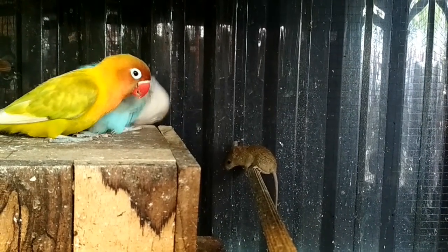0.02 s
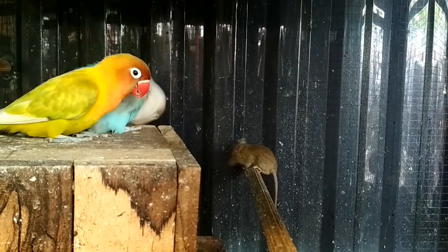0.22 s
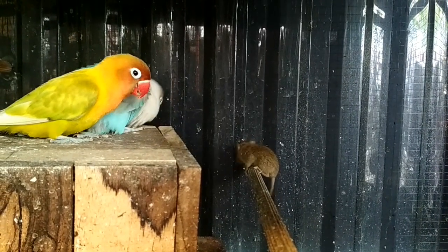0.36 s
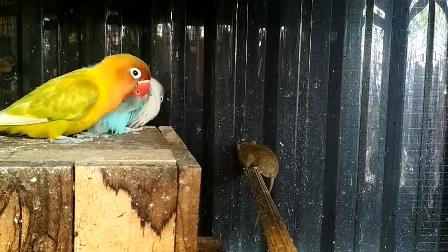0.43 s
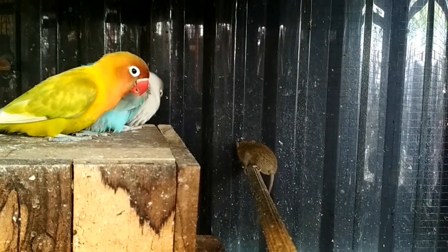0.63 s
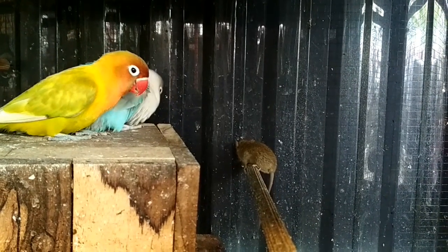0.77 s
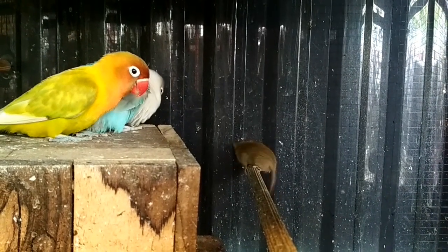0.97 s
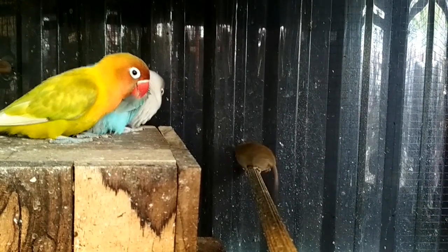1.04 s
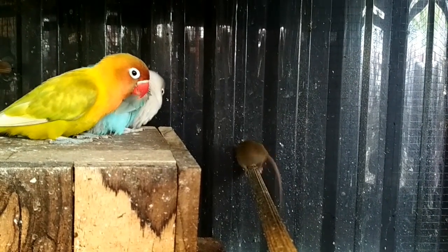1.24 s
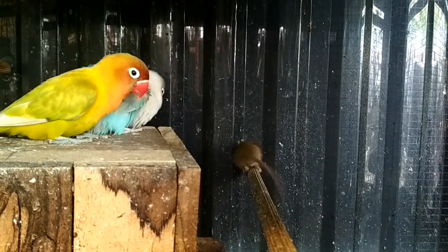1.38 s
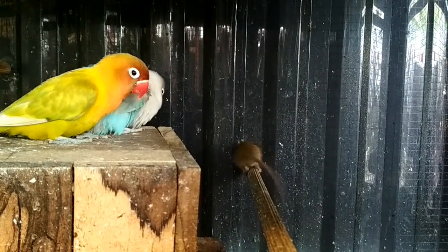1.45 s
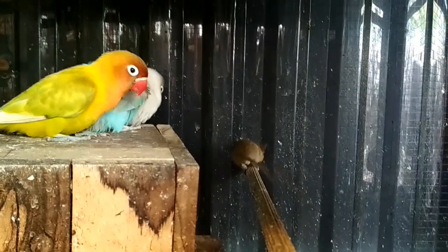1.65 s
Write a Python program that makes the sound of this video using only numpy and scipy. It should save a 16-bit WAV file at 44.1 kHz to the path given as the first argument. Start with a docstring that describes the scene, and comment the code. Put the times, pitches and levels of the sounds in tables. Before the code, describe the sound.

Two piercing mouse squeaks, loud then weak, with tiny claw ticks over faint air and low hum

```python
"""Mouse squeaks in an aviary.

A mouse on a perch in a sheet-metal aviary squeaks twice, loudly then softly; a faint chirp comes later.
Squeaks are wavering partials plus throat-coloured noise: low start, rasp, jump to a high whistle.
Claw ticks, a scuff and shuffles are noise bursts; decaying noise echoes give the walls' brief ring.
Air and a thin hiss are stereo noise, the drone narrow noise, the hums wavering sines."""
import sys
import numpy as np
from scipy import signal
from scipy.fft import rfft, irfft, next_fast_len
from scipy.io import wavfile
from scipy.ndimage import uniform_filter1d, minimum_filter1d, map_coordinates

SR = 44100
rng = np.random.default_rng(int(sys.argv[2]) if len(sys.argv) > 2 else 0)


def wav_out(sig):
    """Save sig, one row per channel (or a flat mono array), as 16-bit PCM at SR to the path in sys.argv[1]."""
    wavfile.write(sys.argv[1], SR, np.round(np.clip(np.atleast_2d(sig).T, -1, 1) * 32767).astype(np.int16))


N = 74970
T = np.arange(N) / SR


def amp(db):
    """Decibels to gain."""
    return 10 ** (np.asarray(db) / 20)


def unit(x):
    """Scale to rms 1."""
    return x / np.sqrt(np.mean(x ** 2) + 1e-20)


def along(points, hz):
    """Read (Hz, value) points on a log frequency axis."""
    f, v = np.transpose(points)
    return np.interp(np.log(hz + 1), np.log(f + 1), v)


def curves(rows):
    """One value per sample for each column after the time."""
    s, *cols = np.transpose(rows)
    return [np.interp(T, s, c) for c in cols]


def swells(rows):
    """Smooth rises and falls from (s, half length s, level dB) rows."""
    return sum(amp(db) * np.exp(-((T - s) / half) ** 2) for s, half, db in rows)


def wobble(knots_per_s):
    """A smooth random curve through normally distributed knots."""
    knots = rng.standard_normal(size=8192)
    return map_coordinates(knots, [T * knots_per_s], mode="wrap")


def filtered(x, response):
    """Apply a frequency response."""
    m = next_fast_len(N + SR // 2)
    return irfft(rfft(x, m) * response(np.fft.rfftfreq(m, 1 / SR)), m)[..., :N]


def noise(colour):
    """Coloured noise of rms 1."""
    return unit(filtered(rng.standard_normal(N), lambda hz: amp(along(colour, hz))))


def lean(tilt, hz):
    """Left and right gains for a level difference, at constant mean power."""
    g = amp(np.outer([.5, -.5], along(tilt, hz)))
    return g / np.sqrt(np.mean(g ** 2, axis=0))


# Stereo likeness. Each row: frequency in Hz, left-right correlation from 0 to 1.
LIKENESS = [(60, 0.99), (150, 0.92), (300, 0.81), (700, 0.64), (1300, 0), (4000, 0.026), (12000, 0)]
# Stereo balance. Each row: frequency in Hz, left minus right in dB.
AIR_BALANCE = [(100, -0.5), (1200, 3.5), (4000, 1.5), (10000, -6.5), (15000, -1.5)]


def diffuse(colour):
    """Stereo noise of rms 1, alike in the bass and unrelated in the treble."""
    def mid_side_gains(hz):
        turn = np.arccos(np.clip(along(LIKENESS, hz), -1, 1)) / 2
        return amp(along(colour, hz)) * [np.cos(turn), np.sin(turn)]

    mid, side = filtered(rng.standard_normal((2, N)), mid_side_gains)
    stereo = np.array([mid + side, mid - side])
    return unit(filtered(stereo, lambda hz: lean(AIR_BALANCE, hz)))


AIR_DB = -47.5
# Air spectrum. Each row: frequency in Hz, relative level in dB.
AIR_COLOUR = [(15, -22), (25, -7.5), (46, -2), (70, -16), (120, -0.5), (184, -5), (235, -8.5), (437, -9.5),
              (542, -14), (1590, -15.5), (4450, -22), (8050, -21.5), (11700, -14), (15800, -20)]


def air():
    """Steady outdoor air as diffuse coloured noise."""
    return amp(AIR_DB) * diffuse(AIR_COLOUR)


HISS_OFFSET_DB, HISS_WOBBLE_DB = 4, 0.3
# Treble level. Each row: time in seconds, level in dB before HISS_OFFSET_DB.
HISS_LEVEL = [(0, -47), (.45, -53.5), (.75, -58.5), (.9, -56), (1.0, -49), (1.12, -48.5), (1.2, -63),
              (1.42, -51), (1.7, -54.5)]
# Hiss spectrum. Each row: frequency in Hz, relative level in dB.
HISS_SPECTRUM = [(4000, -13), (8500, -14.5), (11500, 2.5), (13500, -3), (15800, -1)]


def hiss():
    """Thin treble noise whose level rises and falls."""
    level_db = curves(HISS_LEVEL)[0] + HISS_OFFSET_DB + HISS_WOBBLE_DB * wobble(56.3)
    return amp(level_db) * diffuse(HISS_SPECTRUM)


DRONE_HZ, DRONE_SIGMA_HZ, DRONE_DB = 171.7, 11.6, -61.5


def drone():
    """Noise narrowed by a Gaussian band until it has a pitch."""
    band = lambda hz: np.exp(-((hz - DRONE_HZ) / DRONE_SIGMA_HZ) ** 2 / 2)
    return amp(DRONE_DB) * unit(filtered(rng.standard_normal(N), band))


HUM_WANDER_SHARE = 0.03


def wavering_tone(hz):
    """A distant sine of rms 1 whose frequency wanders."""
    wandering_hz = hz * (1 + HUM_WANDER_SHARE * wobble(24.02))
    return unit(np.sin(2 * np.pi * np.cumsum(wandering_hz) / SR))


HUM_HZ = 112
# Hum level. Each row: time in seconds, level in dB.
HUM_LEVEL = [(.12, -76), (.18, -54), (.9, -57), (1.05, -76), (1.38, -62), (1.46, -46.5), (1.55, -54.5),
             (1.7, -62)]


def low_hum():
    """A wavering low tone that comes and goes."""
    return amp(curves(HUM_LEVEL)[0]) * wavering_tone(HUM_HZ)


TICK_T60_S = 0.02
# Claw ticks. Each row: start in seconds, level in dB.
CLAW_TICKS = [(.004, -30.5), (0.202, -21.5), (0.953, -38), (0.982, -34.5), (1.086, -31.5), (1.093, -38),
              (1.135, -35.5), (1.246, -34), (1.301, -36.5)]
# Tick spectrum. Each row: frequency in Hz, relative level in dB.
TICK_SPECTRUM = [(300, -15), (2000, -12), (3500, -8.5), (7000, -17.5), (11000, 5), (14000, 1.5),
                 (16000, -7)]


def claw_ticks():
    """Sharp, bright noise bursts that decay exponentially."""
    envelope = sum((T >= s) * amp(db - 60 * np.abs(T - s) / TICK_T60_S) for s, db in CLAW_TICKS)
    return noise(TICK_SPECTRUM) * envelope


SCUFF_S, SCUFF_HALF_S, SCUFF_DB = 0.08, 0.0092, -43
# Scuff spectrum. Each row: frequency in Hz, relative level in dB.
SCUFF_SPECTRUM = [(1000, -14), (2400, -13), (3200, -1), (6500, -7), (9000, -8), (15000, -19.5)]


def scuff():
    """A foot slips on the perch: a noise swell duller than the ticks."""
    return noise(SCUFF_SPECTRUM) * swells([(SCUFF_S, SCUFF_HALF_S, SCUFF_DB)])


EARLY_DB, EARLY_T60_S, TAIL_DB, WALL_DELAY_S = 4.5, 0.099, -6.5, .0022
EVEN_HZ = 240  # smoothing width for evening out the colour
# Wall decay. Each row: frequency in Hz, T60 in seconds.
WALL_DECAY = [(300, 0.52), (4500, 0.23), (9000, 0.23), (15000, 0.2)]
# Mouse stereo balance. Each row: frequency in Hz, left minus right in dB.
MOUSE_BALANCE = [(2500, 1.5), (4400, -2.5), (8500, -3.5), (11000, -13), (14000, 2)]


def aviary(x):
    """Direct sound plus dense near-wall echoes and a short tail, even in broad colour, mostly right."""
    hz, t, z = signal.stft(rng.standard_normal((2, SR // 2)), SR, nperseg=256)
    decay = amp(-60 * t / along(WALL_DECAY, hz)[:, None])
    tail = signal.istft(z * decay, SR, nperseg=256)[1]
    early = rng.standard_normal(tail.shape) * amp(-60 * T[:tail.shape[1]] / EARLY_T60_S)
    echo = amp(TAIL_DB) * tail / np.linalg.norm(tail[0])
    echo += amp(EARLY_DB) * early / np.linalg.norm(early[0])
    m = 2 * N
    f = np.fft.rfftfreq(m, 1 / SR)
    paths = 1 + rfft(echo, m) * np.exp(-2j * np.pi * f * WALL_DELAY_S)
    paths /= np.sqrt(uniform_filter1d(np.abs(paths) ** 2, int(EVEN_HZ / f[1]), axis=1))
    return irfft(rfft(x, m) * paths * lean(MOUSE_BALANCE, f), m)[:, :N]


# Shuffles. Each row: centre in seconds, half length in seconds, level in dB.
SHUFFLE_SWELLS = [(0.094, 0.016, -49.5), (0.205, 0.07, -53.5), (0.308, 0.033, -50), (0.48, 0.018, -51.5),
                  (1.367, 0.044, -52)]
# Shuffle spectrum. Each row: frequency in Hz, relative level in dB.
SHUFFLE_SPECTRUM = [(100, -26), (320, -1), (800, -1.5), (2000, -3.5), (5000, -33), (15000, -34)]


def shuffles():
    """Dull, brief rubbing on wood as swells of diffuse noise."""
    return diffuse(SHUFFLE_SPECTRUM) * swells(SHUFFLE_SWELLS)


WAVER_KNOTS_PER_S = 521.6
JITTER_SHARE, JITTER_KNOTS_PER_S = 0.102, 1800  # pitch scatter at roughness 1
SMEAR_RADIANS, SMEAR_KNOTS_PER_S = 0.94, 418.8  # first partial at roughness 1
FLUTTER_DB, FLUTTER_KNOTS_PER_S = 4, 258.5
WHISTLE_HZ = 3960  # pitch where the voice flips into its whistle
RASP_DB, EDGE_S = -1, 0.0024


def squeak(rows, throat, waver_share, low_rasp_db):
    """A wavering tone made breathy by phase drift; roughness trades it for rasp, less low in the whistle."""
    pitch_hz, level_db, rough = curves(rows)
    rough = np.clip(rough, 0, 1)

    waver = waver_share * wobble(WAVER_KNOTS_PER_S)
    jitter = JITTER_SHARE * rough ** 2 * wobble(JITTER_KNOTS_PER_S)
    phase = 2 * np.pi * np.cumsum(pitch_hz * (1 + waver + jitter)) / SR

    orders = np.arange(1, 7)[:, None]
    drift = np.array([wobble(SMEAR_KNOTS_PER_S) for _ in orders])
    smear = SMEAR_RADIANS * np.sqrt(orders * rough) * drift
    # Partials fade out below the Nyquist frequency.
    audible = np.clip((SR / 2 - orders * pitch_hz) / pitch_hz - .5, 0, 1)
    partials = (audible * np.sin(orders * phase + smear)).sum(0)
    tone = filtered(partials, lambda hz: amp(along(throat, hz)))
    # Divide by the expected rms so that the throat leaves the level alone.
    tone /= np.sqrt(((audible * amp(along(throat, orders * pitch_hz))) ** 2).sum(0) / 2)

    rush = noise(throat)
    high = filtered(rush, lambda hz: hz > WHISTLE_HZ)
    low = filtered(rush, lambda hz: (hz > throat[0][0]) & (hz <= WHISTLE_HZ))
    rasp = amp(RASP_DB) * rough * (high + low * amp(low_rasp_db * (pitch_hz > WHISTLE_HZ)))

    gate = np.clip(np.minimum(T - rows[0][0], rows[-1][0] - T) / EDGE_S + .5, 0, 1)
    flutter_db = FLUTTER_DB * np.tanh(wobble(FLUTTER_KNOTS_PER_S))
    return gate * amp(level_db + flutter_db) * (np.sqrt(1 - rough ** 2) * tone + rasp)


# Loud squeak. Each row: time in seconds, pitch in Hz, level in dB, roughness from 0 to 1.
LOUD_PATH = [(.205, 2560, -36, 0.2), (.213, 2653, -25.5, 0.27), (.223, 2698, -17.5, .3),
             (.232, 2699, -16, 0.54), (.241, 2723, -15.5, 0.79), (.244, 3403, -11.5, 0.75),
             (.257, 3508, -21.5, 0.87), (.259, 4267, -10.5, 0.48), (.267, 4350, -16, 0.68),
             (.273, 4310, -7, 0.11), (.290, 4313, -11, 0.25), (.294, 5014, -13.5, 0.26),
             (.301, 4404, -21, 0.32), (.308, 4990, -16, .28), (.318, 4870, -33, 0.1)]
# Throat with the mouth wide. Each row: frequency in Hz, relative level in dB.
WIDE_THROAT = [(2250, -28), (2600, -4.5), (3400, -8), (3850, -17.5), (4300, 6.5), (5400, -0.5), (7000, 5.5),
               (8100, -12), (9300, -2), (11500, 2), (14000, -1.5), (15400, -10)]


def loud_squeak():
    """A strong squeak through a wide mouth, its low rasp nearly gone in the whistle."""
    return squeak(LOUD_PATH, WIDE_THROAT, waver_share=0.0243, low_rasp_db=-38)


UPPER_HUM_HZ = 285
# Upper hum swells. Each row: centre in seconds, half length in seconds, level in dB.
UPPER_HUM_SWELLS = [(.24, 0.025, -53.5), (.39, 0.018, -49), (.52, 0.057, -54.5), (.67, 0.014, -51)]


def upper_hum():
    """A higher wavering tone heard in short swells."""
    return swells(UPPER_HUM_SWELLS) * wavering_tone(UPPER_HUM_HZ)


# Soft squeak. Each row: time in seconds, pitch in Hz, level in dB, roughness from 0 to 1.
SOFT_PATH = [(.541, 2552, -39.5, 0.18), (.552, 2903, -33, 0.25), (.554, 3480, -27, .22),
             (.561, 3535, -45, 1), (.569, 4254, -34, 0.24), (.574, 4089, -30.5, 0.26),
             (.587, 4317, -31.5, 0.35), (.597, 4150, -35, 1), (.610, 3993, -33.5, 0.48),
             (.619, 3803, -29, 0.18), (.629, 4084, -40, 0.29), (.638, 3900, -45, 0.2)]
# Second, lower voice under the whistle. Each row: time in seconds, pitch in Hz, level in dB, roughness.
UNDERTONE_PATH = [(.596, 2640, -34, 0.18), (0.6, 2640, -30.5, .15), (.606, 2750, -47, 0.42)]
# Throat with the mouth narrow. Each row: frequency in Hz, relative level in dB.
NARROW_THROAT = [(2000, -33), (2600, 3), (3200, -5.5), (4100, 7.5), (5800, -11.5), (7200, 3), (9500, 1),
                 (12000, 4.5), (14000, -15), (15500, -24)]


def soft_squeak():
    """A weaker squeak through a narrow mouth, two voices sounding together for a moment."""
    paths = (SOFT_PATH, UNDERTONE_PATH)
    return sum(squeak(rows, NARROW_THROAT, waver_share=0.0205, low_rasp_db=-2) for rows in paths)


# Chirp. Each row: time in seconds, pitch in Hz, level in dB, roughness from 0 to 1.
CHIRP_PATH = [(.905, 2580, -58, 0.53), (.95, 3020, -52, 0.31), (.985, 3020, -60, 0.66)]
# Throat in the chirp. Each row: frequency in Hz, relative level in dB.
THIN_THROAT = [(2000, -19), (2900, 0), (6000, 3), (9000, 1), (14000, -4)]


def faint_chirp():
    """A faint call that stays below the whistle pitch."""
    return squeak(CHIRP_PATH, THIN_THROAT, waver_share=0.0138, low_rasp_db=0)


def scene():
    """The mouse in the aviary, over the background."""
    mouse = claw_ticks() + scuff() + loud_squeak() + soft_squeak() + faint_chirp()
    background = air() + hiss() + drone() + low_hum() + upper_hum()
    return aviary(mouse) + shuffles() + background


CEILING, LIMIT_SAMPLES, TOP_HZ = .86, 160, 15800


def record(dry):
    """A fast limiter holds down the peaks, then a band limit removes the top."""
    needed = CEILING / np.maximum(np.abs(dry).max(0), CEILING)
    held = minimum_filter1d(needed, size=LIMIT_SAMPLES)
    gain = uniform_filter1d(held, size=LIMIT_SAMPLES)
    return filtered(dry * gain, lambda hz: hz < TOP_HZ)


dry = scene()
out = record(dry)
wav_out(out)
```